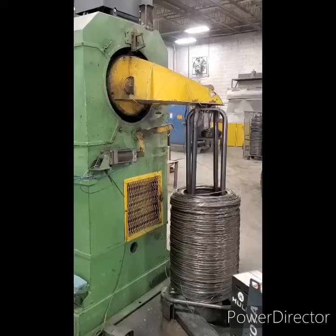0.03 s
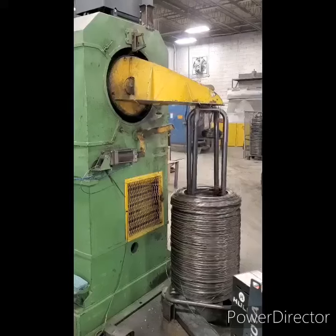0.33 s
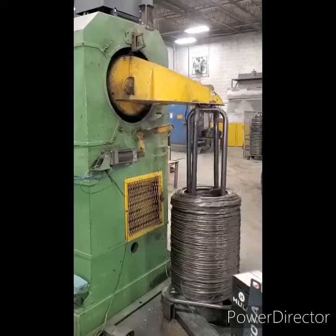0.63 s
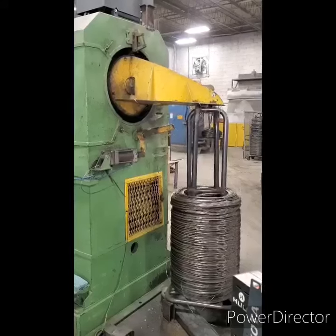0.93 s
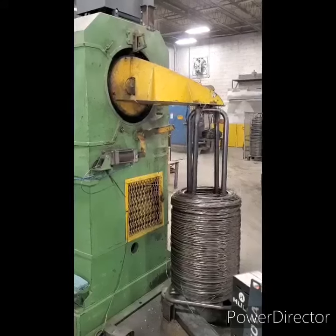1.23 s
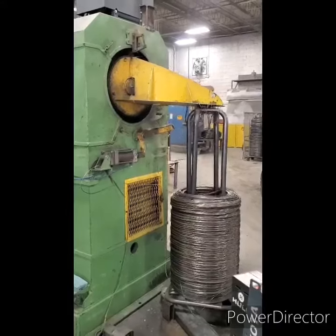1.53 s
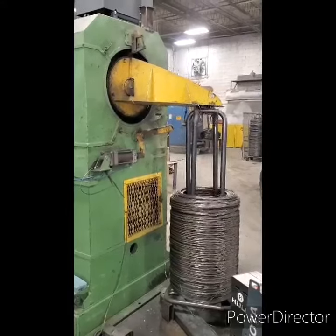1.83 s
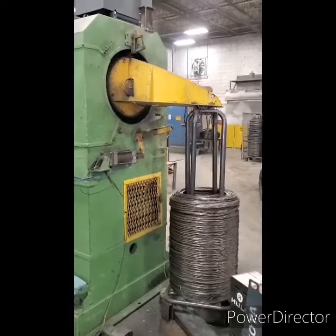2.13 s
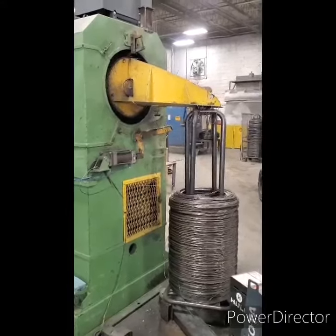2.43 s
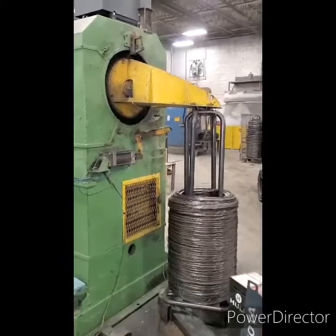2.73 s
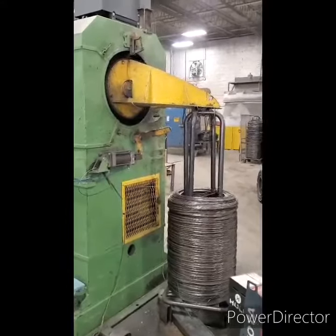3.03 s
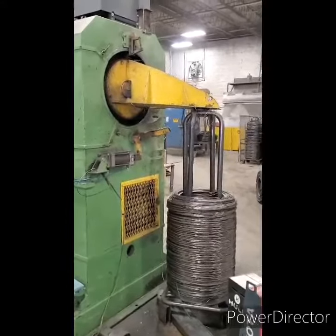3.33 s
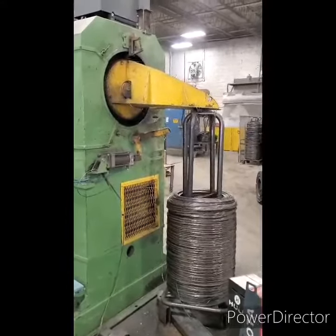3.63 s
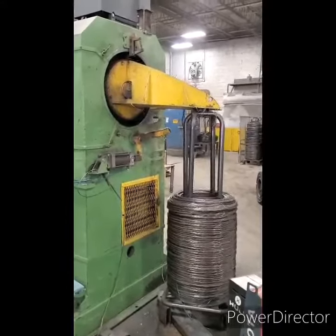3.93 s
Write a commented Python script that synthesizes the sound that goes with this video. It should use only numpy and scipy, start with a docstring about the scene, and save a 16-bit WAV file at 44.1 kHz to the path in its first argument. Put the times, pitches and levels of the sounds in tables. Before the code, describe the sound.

A wire drawing machine rumbles and hums as wire chatters against steel in a factory.

```python
"""A wire drawing machine runs steadily in a factory hall. The sound cuts in quietly: the drive rumbles
and hums, wire chatters against steel on the right as it is coiled, and friction in the guides gives a
thin, fitful sizzle. From just before one second the wire drags now and then with a rasp, and the whole
is faded up. From about two seconds, at full level, the frame thumps at its low resonances.
Near three seconds, and again near the end, the taut wire sings briefly."""
import sys
import numpy as np
from scipy import signal
from scipy.fft import rfft, irfft
from scipy.io import wavfile
from scipy.ndimage import uniform_filter1d

SR = 44100
rng = np.random.default_rng(int(sys.argv[2]) if len(sys.argv) > 2 else 0)


def wrap_up_sound(samples):
    """Save the sound to the file named by the first command line argument, as 16-bit audio."""
    columns = np.atleast_2d(samples).T
    # keep every value between -1 and 1, then stretch to whole-number steps
    tamed = np.clip(columns, -1, 1)
    steps = np.round(tamed * 32767).astype(np.int16)
    wavfile.write(sys.argv[1], SR, steps)


N = 176400
TIME = np.arange(N) / SR
FREQ = np.fft.rfftfreq(N, 1 / SR)


def drive_roar():
    """Broadband machine noise in a hall: coherent between the sides in the bass, diffuse above."""
    # frequency_hz, left_db_per_hz, right_db_per_hz
    density = [(15, -72, -72), (30, -74, -74), (50, -50.5, -48), (82.6, -45.5, -47.5), (126, -45.5, -45.8),
               (195, -45.5, -44.5), (225, -48.5, -47.5), (360, -49, -47.5), (420, -52.5, -52.5),
               (475, -52, -52.5), (567, -50, -51), (694, -49, -45.5), (760, -54.5, -50.5),
               (860, -56, -52.5), (1030, -55.5, -57), (1160, -55.5, -57), (1210, -55, -53),
               (1380, -58.5, -54), (1590, -58, -54), (2000, -65, -51), (2800, -64, -58), (3130, -63.5, -57),
               (3470, -61, -61.5), (4000, -61.5, -60.5), (5470, -68.5, -71), (6700, -65, -65),
               (7840, -91, -82), (8440, -74, -69), (9770, -81.5, -102), (10670, -73.5, -68.5),
               (13000, -73, -78.5)]
    # frequency_hz, left_right_correlation
    coherence = [(60, 0.96), (130, 1), (280, 0.85), (610, 0.59), (1310, 0.021), (13000, 0.032)]
    left_lead_s = .00005
    common, independent = rfft(rng.standard_normal((2, N)))
    alike = spectrum(coherence, FREQ)[0]
    left = common * np.exp(2j * np.pi * FREQ * left_lead_s)
    right = alike * common + np.sqrt(1 - alike ** 2) * independent
    noise = irfft(np.array([left, right]) * amp(spectrum(density, FREQ)), N) * np.sqrt(SR / 2)
    return heave(flicker(noise))


def flicker(noise):
    """Random amplitude modulation, first in small patches of time and frequency, then overall."""
    patch_s, patch_hz, patch_db, flicker_db = .025, 300, .5, 1.32
    size, hop = 2048, 512
    frames = signal.stft(noise, nperseg=size, noverlap=size - hop)[2]
    patches = rng.standard_normal((frames.shape[2], frames.shape[1])).T
    patches = uniform_filter1d(patches, round(patch_s * SR / hop), axis=1)
    patches = unit(uniform_filter1d(patches, round(patch_hz * size / SR), axis=0))
    mottled = signal.istft(frames * amp(patch_db * patches), nperseg=size, noverlap=size - hop)[1]
    return mottled[:, :N] * amp(flicker_db * waver(hz=38.8))


def heave(noise):
    """Slow modulation of the low band alone: the deep rumble rises and falls."""
    # time_s, gain_db
    rumble_gain = [(.16, -3), (.7, -0.5), (1.3, -1.5), (1.85, -2), (2.03, -0.5), (2.25, -3.5), (2.7, -.5),
                   (3.3, -1.5), (4, 0)]
    cutoff_hz = 155
    deep = irfft(rfft(noise) / (1 + (FREQ / cutoff_hz) ** 6), N)
    return noise + deep * (amp(curve(rumble_gain)) - 1)


def drive_hum():
    """Periodic forces give a line spectrum: a clean gear tone above weaker motor and frame tones."""
    # pitch_hz, left_db, right_db, left_lead_rad
    motor_tones = [(60, -46, -45, 0), (99.3, -41, -41, 0), (108, -39.5, -39.5, 0), (125.2, -38, -38.5, 0),
                   (250.3, -45, -38, .3), (360.2, -45, -40, 0), (549, -41, -49, 0), (653, -43, -45, 0),
                   (675, -44, -43, 0), (751, -49, -38.5, .5), (1080.4, -42, -60, 0), (2336, -56, -39, 1),
                   (3216, -56, -43, 0), (4210, -66, -52, 0)]
    # time_s, gain_db
    motor_gain = [(.16, -2.5), (1.2, 3.5), (1.7, 4.5), (2.25, 0), (2.7, 3), (3.3, 2.5), (4, -.5)]
    # time_s, gain_db
    gear_gain = [(.16, -2), (.55, 3), (1.0, 0), (1.35, 3.5), (1.6, 0), (1.95, 3), (2.15, 2.5), (2.39, 4.5),
                 (2.48, 1), (2.8, 3.5), (3.0, 0), (3.3, -0.5), (3.5, -4), (3.7, 6), (4, -3)]
    motor = sum(drive_tone(*row, waver_db=1.5, drift_rad=.3) for row in motor_tones)
    gear = drive_tone(375.5, left_db=-29.5, right_db=-32.2, left_lead_rad=.2, waver_db=.8, drift_rad=.2)
    return motor * amp(curve(motor_gain)) + gear * amp(curve(gear_gain))


def drive_tone(pitch_hz, left_db, right_db, left_lead_rad, waver_db, drift_rad):
    """A sinusoid with slight random amplitude and phase modulation, on both sides."""
    phase = 2 * np.pi * (pitch_hz * TIME + rng.random()) + drift_rad * waver(hz=4)
    level = np.sqrt(2) * amp(waver_db * waver(hz=4))
    left = amp(left_db) * np.sin(phase + left_lead_rad)
    right = amp(right_db) * np.sin(phase)
    return level * np.array([left, right])


def frame_thumps():
    """Low normal modes of the frame swell and die away in short, dull thumps."""
    # centre_s, length_s, pitch_hz, level_db
    thumps = [(1.973, 0.051, 131, -19), (2.08, 0.049, 130.8, -21), (2.154, 0.079, 138, -26),
              (2.48, 0.048, 111.2, -24), (2.648, 0.045, 158, -21.5), (2.785, 0.05, 110, -25.5),
              (3.035, .09, 116, -22), (3.07, 0.041, 243, -30), (3.254, 0.043, 110.3, -19.5),
              (3.362, 0.051, 111.6, -18), (3.55, 0.05, 133.3, -22), (3.665, 0.051, 95.7, -21.5),
              (3.842, .05, 105.2, -27), (3.924, 0.033, 92, -20)]
    out = np.zeros(N)
    for centre_s, length_s, pitch_hz, level_db in thumps:
        mode = np.sqrt(2) * np.sin(2 * np.pi * (pitch_hz * TIME + rng.random()))
        out += amp(level_db) * swell(centre_s, length_s) * mode
    return out


def wire_chatter():
    """Impact excitation: countless hits of wire on steel ring briefly and reverberate in the hall."""
    # frequency_hz, relative_db
    steel_response = [(900, -40), (1200, -14), (1350, -5.5), (1900, -9.5), (2030, -1), (2300, -0.5),
                      (2600, -0.5), (2950, -4), (3200, -4.5), (3550, -18), (3950, -33.5), (4200, -16),
                      (4450, -18), (5400, -13.5), (5750, -17), (6700, -16.5), (8000, -29.5), (13000, -57)]
    # time_s, gain_db
    strength = [(.16, 1.5), (.5, 4), (.7, -2.5), (1.0, 0.5), (1.2, -1), (1.6, 0), (2.1, -2.5), (2.8, 0.5),
                (2.98, 3.5), (3.2, 0.5), (4, 2.5)]
    hits_per_s, spots = 1900, 8
    steel_t60_s, hall_t60_s, hall_db = .0083, .64, -1.5
    drag_share, waver_db = .12, 1.5
    ringing = np.zeros((2, N))
    for _ in range(spots):
        hits = (rng.random(N) < hits_per_s / SR / spots).astype(float)
        for side in range(2):
            ringing[side] += ring(hits, steel_t60_s) + amp(hall_db) * ring(hits, hall_t60_s)
    coloured = irfft(rfft(ringing) * amp(spectrum(steel_response, FREQ)), N)
    gain = amp(curve(strength) + drag_share * drag_db() + waver_db * waver(hz=8.5))
    return sides(left_db=-34, right_db=-18.5) * [unit(side) for side in coloured] * gain


def wire_rasp():
    """Stick-slip friction: each quick slip of the wire rings the steel modes by differing amounts."""
    # pitch_hz, bandwidth_hz, relative_db
    modes = [(2074, 170, -2.5), (2142, 73, 0), (2330, 50, 1), (2490, 140, -3), (2710, 270, -4),
             (3180, 250, -9.5)]
    slips_per_s, spread_db, waver_db = 1000, 1, 1.5
    sizes = amp(spread_db * np.minimum(rng.exponential(1, N), 3))
    slips = sizes * (rng.random(N) < slips_per_s / SR)
    t = TIME[:SR // 10]
    ringing = np.zeros((2, N))
    for pitch_hz, bandwidth_hz, relative_db in modes:
        mode = np.exp(-np.pi * bandwidth_hz * t) * np.sin(2 * np.pi * pitch_hz * t)
        force = slips * rng.uniform(-.96, 1, (2, N))
        ringing += amp(relative_db) * unit(signal.oaconvolve(force, mode[None])[:, :N])
    gain = amp(drag_db() + waver_db * waver(hz=60))
    return sides(left_db=-45, right_db=-23.5) * unit(ringing) * gain


def drag_db():
    """Friction excites the steel more strongly in the moments when the wire drags."""
    # centre_s, length_s, gain_db
    drags = [(0.822, 0.03, 6.5), (1.137, 0.062, 2), (1.243, .025, 8), (1.35, 0.044, 3), (1.635, .03, 5),
             (1.7, 0.091, 6), (1.786, .04, 3), (1.912, 0.058, 9), (1.97, 0.043, 2), (2.042, .04, 6.5),
             (2.098, 0.019, 6), (2.19, 0.05, 5.5), (2.237, 0.022, 8), (2.49, .027, 9), (2.567, 0.017, 9.5),
             (2.637, 0.061, 7), (2.768, .04, -1), (2.908, .018, 11.5), (2.96, 0.06, 10.5), (3.03, .022, 3),
             (3.095, .045, 7), (3.214, .022, 8), (3.322, 0.036, 8.5), (3.45, 0.065, 5), (3.742, 0.045, 10)]
    return sum(gain_db * swell(centre_s, length_s) for centre_s, length_s, gain_db in drags)


def guide_scrape():
    """Sliding friction in the guides excites two narrow, hissing resonances that surge together."""
    # centre_s, strength
    surges = [(.31, 3.5), (.37, 3), (.53, 3), (1.17, -1), (1.76, -4), (1.865, 3), (2.0, 1), (2.29, 1),
              (2.38, 1), (2.46, 0.5), (2.53, -3), (2.59, 1), (2.80, 3), (2.89, -3), (2.98, 3), (3.04, -3),
              (3.125, 2.5), (3.27, -2), (3.46, 1.5), (3.61, 2.5), (3.735, 3)]
    # time_s, gain_db
    low_gain = [(.16, 4.5), (1.2, 3), (1.8, -5), (2.4, -7), (2.75, 1.5), (3.3, 3.5), (3.8, 0), (4, 10)]
    low_depth_db, high_depth_db = .8, 1.8  # per unit of surge
    surge = sum(strength * swell(centre_s, length_s=.036) for centre_s, strength in surges)
    surge += .8 * waver(hz=24.8)
    low = unit(hiss_band(6088, bandwidth_hz=230) * amp(low_depth_db * surge))
    high = unit(hiss_band(11970, bandwidth_hz=950) * amp(high_depth_db * surge))
    return sides(-40, -37) * low * amp(curve(low_gain)) + sides(-37.5, -29) * high


def wire_singing():
    """Lightly damped resonances of the taut wire sound briefly as narrow bands of noise."""
    # centre_s, length_s, pitch_hz, level_db
    notes = [(2.945, .045, 4950, -33), (2.947, .045, 5430, -29), (2.96, .05, 5920, -35),
             (3.798, .05, 6090, -36)]
    return sum(amp(level_db) * swell(centre_s, length_s) * hiss_band(pitch_hz, bandwidth_hz=55)
               for centre_s, length_s, pitch_hz, level_db in notes)


def ring(hits, t60_s):
    """Densely spaced modes respond like exponentially decaying noise, here of unit energy."""
    tail = rng.standard_normal(SR) * amp(-60 * TIME[:SR] / t60_s)
    return signal.fftconvolve(hits, tail / np.linalg.norm(tail))[:N]


def hiss_band(pitch_hz, bandwidth_hz):
    """Noise through one resonance, uncorrelated between the sides."""
    noise = rfft(rng.standard_normal((2, N)))
    return unit(irfft(noise / (1 + (2 * (FREQ - pitch_hz) / bandwidth_hz) ** 2), N))


def waver(hz):
    """Low-pass random motion of rms 1, up to about the given rate."""
    low_pass = np.exp(-(FREQ / hz) ** 2) * (FREQ > 0)
    return unit(irfft(rfft(rng.standard_normal(N)) * low_pass, N))


def swell(centre_s, length_s):
    """Gaussian envelope; the length is its full width at 1/e of the peak."""
    return np.exp(-(2 * (TIME - centre_s) / length_s) ** 2)


def spectrum(table, hz):
    """Interpolates each value column on a logarithmic frequency axis."""
    points_hz, *columns = np.transpose(table)
    return np.array([np.interp(np.log(hz + 1), np.log(points_hz + 1), column) for column in columns])


def curve(table):
    """Linear interpolation between (time_s, value) points."""
    return np.interp(TIME, *np.transpose(table))


def sides(left_db, right_db):
    """A level difference between the ears places a source to one side."""
    return amp([[left_db], [right_db]])


def amp(db):
    """Decibels to amplitude ratio."""
    return 10 ** (np.asarray(db) / 20)


def unit(x):
    """Scales to rms 1."""
    return x / np.sqrt(np.mean(x ** 2) + 1e-20)


def scene():
    """Superposition: the pressures from the drive and the wire add."""
    drive = drive_roar() + drive_hum() + frame_thumps()
    return drive + wire_chatter() + wire_rasp() + guide_scrape() + wire_singing()


def record(dry):
    """The sound cuts in and is faded up; soft saturation rounds its peaks and a low-pass follows."""
    # time_s, gain_db
    fader = [(.16, -11.5), (.5, -11.5), (1.05, -11.5), (1.35, -5), (1.66, -2.5), (2.05, 1.3), (2.4, 0),
             (3.0, -0.1), (4.0, -1.24)]
    start_s, cut_in_s, ceiling, cutoff_hz = .16, .004, .93, 13150
    faded = dry * amp(curve(fader)) * np.clip((TIME - start_s) / cut_in_s, 0, 1)
    knee = .7 * ceiling
    linear = np.clip(faded, -knee, knee)
    rounded = linear + (ceiling - knee) * np.tanh((faded - linear) / (ceiling - knee))
    low_pass = signal.firwin(1023, cutoff_hz, window=("kaiser", 9), fs=SR)
    return signal.oaconvolve(rounded, low_pass[None], "same")


dry = scene()
out = record(dry)
wrap_up_sound(out)
```